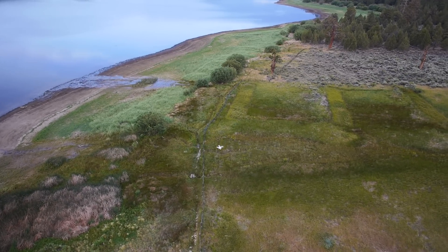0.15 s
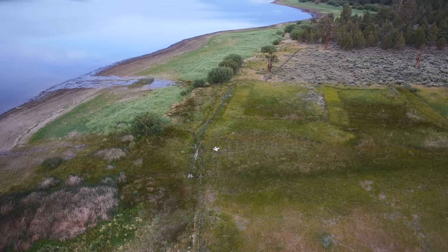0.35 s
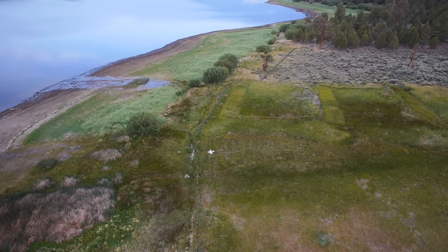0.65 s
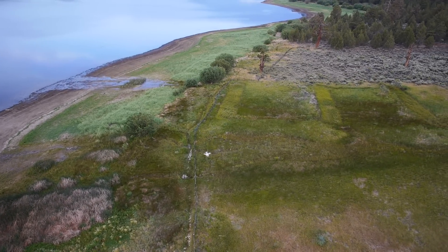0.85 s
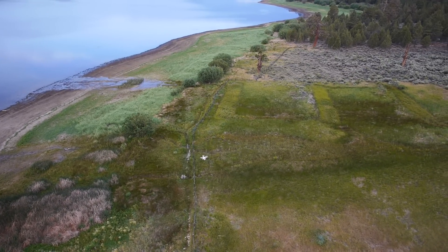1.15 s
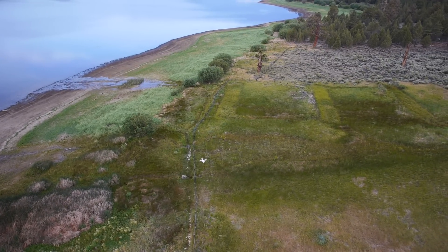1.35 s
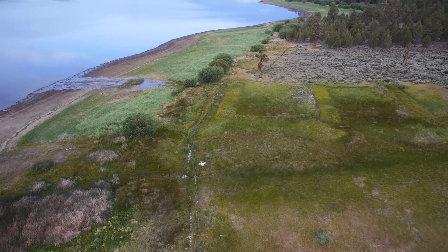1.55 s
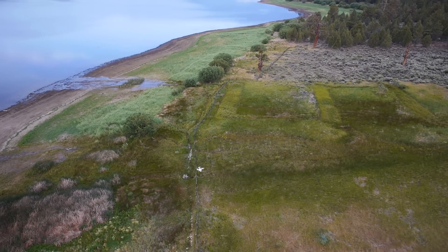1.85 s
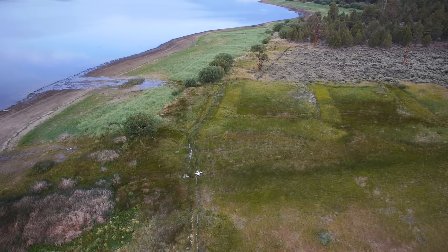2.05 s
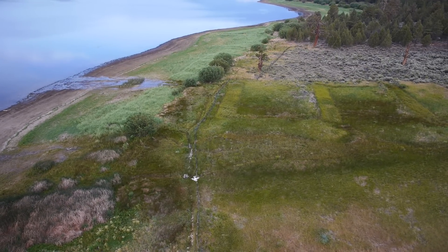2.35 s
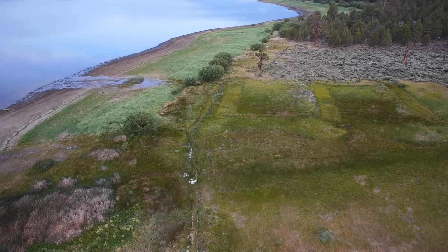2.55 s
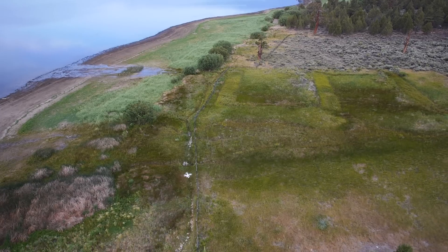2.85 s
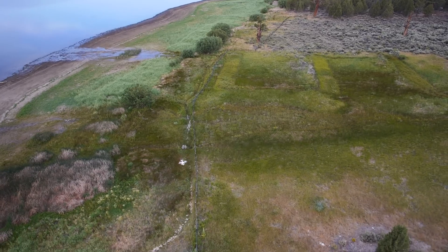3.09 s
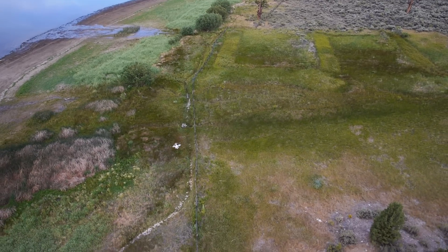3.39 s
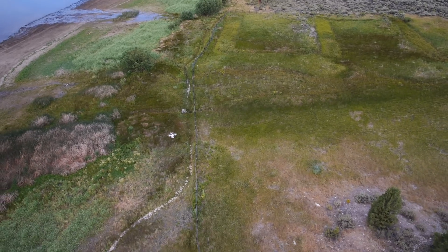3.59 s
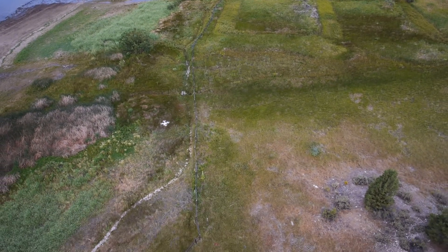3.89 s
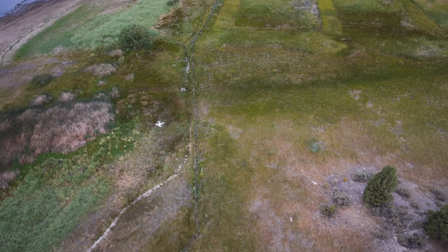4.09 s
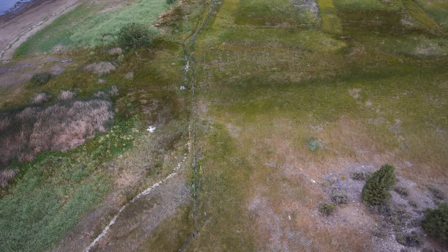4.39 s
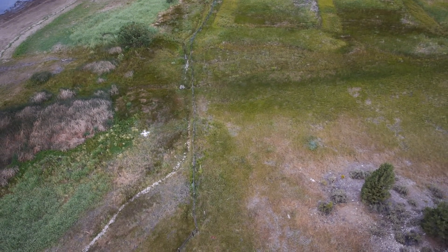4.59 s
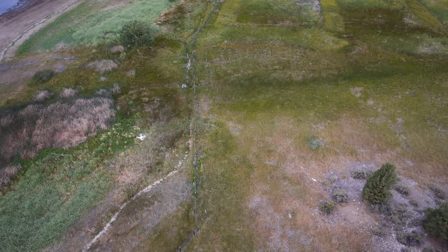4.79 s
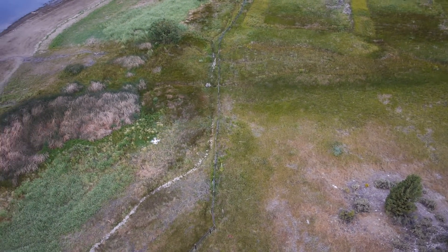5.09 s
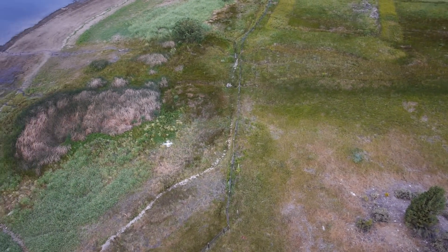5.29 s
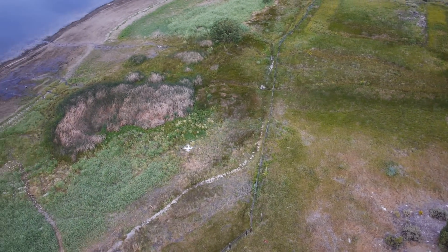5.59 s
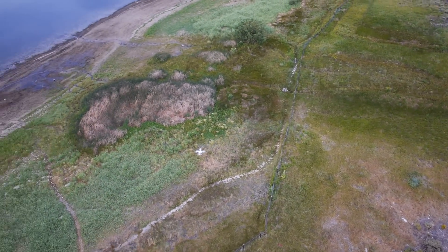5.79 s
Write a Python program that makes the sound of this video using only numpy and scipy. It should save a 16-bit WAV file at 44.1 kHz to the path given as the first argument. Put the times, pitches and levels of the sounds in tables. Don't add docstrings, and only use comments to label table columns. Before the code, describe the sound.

A multirotor drone buzzes steadily overhead in flight, a rough many-pitched propeller hum with airy hiss, heard very close from its own camera.

```python
import sys
import numpy as np
from scipy import signal
from scipy.fft import rfft, irfft, next_fast_len
from scipy.io import wavfile
from scipy.ndimage import uniform_filter1d, map_coordinates

SR = 44100
rng = np.random.default_rng(int(sys.argv[2]) if len(sys.argv) > 2 else 0)


def invert_db(level):
    return 10 ** (np.asarray(level, dtype=float) / 20)


def transcribe(signal):
    frames = np.atleast_2d(signal).T
    limited = np.clip(frames, -1, 1)
    pcm = np.round(limited * 32767).astype(np.int16)
    wavfile.write(sys.argv[1], SR, pcm)


N = 261947

# hum/dB, hum brightness/(dB per order), slap/dB, swish/dB, tip hiss/dB
ROTORS = [(-7.5, -.4, -11.5, -9.5, -6), (-1.5, 0.7, -3.5, 4, -4.5), (0.5, 0.72, -5.5, 3, 2),
          (-8, 0.3, -10, -8, -9), (-1, 0, -10, -18.5, -23), (1, -0.5, -6, -10.5, -18),
          (-15, 0.5, -18, -14, -5.5)]
# hum/dB, slap/dB
FACING = [(-.7, 1), (-.5, 0), (-1, 1), (-1, 0), (-2, -4.5), (-2, -3.5), (3.5, 3)]
# hover blade rate/Hz, share of thrust, of roll, of pitch, of yaw
MIXER = [(200.91, 0.16, 0.24, -0.87, -0.47), (188.742, 1.0, -1.0, 0.0, 0.0), (187.796, 1.0, 1.0, 0.0, 0.0),
         (192.21, 0.27, 0.45, -0.5, -1.02), (183.6, 1.14, -0.19, 1.0, -0.21),
         (185.7, 0.66, -0.11, 0.98, -0.66), (195.98, 0.51, -0.86, 0.02, -0.95)]
# t/s, change/Hz
THRUST = [(0.0, -1.45), (0.44, -2.24), (1.1, -0.94), (1.32, -0.06), (1.54, -1.25), (1.87, 1.4), (2.2, -0.2),
          (2.53, 1.81), (2.86, 2.23), (3.08, 1.44), (3.19, 2.19), (3.74, 0.62), (4.18, 0.76), (4.29, 1.81),
          (4.62, -0.18), (4.84, 0.36), (5.39, -1.26), (5.94, -1.44)]
ROLL = [(0, -3.53), (.22, -3.27), (.55, -4.97), (.77, -4.07), (.99, -.45), (1.21, -2.47), (1.87, -2.64),
        (2.09, -.82), (2.31, .05), (4.07, .97), (4.33, .1), (4.57, 9), (4.67, 11.2), (4.78, 9.2),
        (5.17, 1.16), (5.28, .94), (5.5, 4.47), (5.72, -2.81), (5.94, -3.64)]
PITCH = [(0.0, -0.35), (1.21, -2.91), (1.54, -0.41), (1.87, -2.97), (2.09, -0.05), (2.53, -1.61),
         (3.08, 0.84), (3.3, 0.41), (3.52, 1.57), (4.18, 3.0), (4.62, -2.99), (4.73, -3.25), (5.17, 2.14),
         (5.94, 4.39)]
YAW = [(0.0, 1.0), (0.66, 1.37), (0.88, -0.48), (1.65, -0.86), (1.98, -0.14), (2.09, -1.99), (2.86, 0.09),
       (3.41, -0.06), (4.4, 1.75), (4.51, -0.06), (5.06, 1.01), (5.5, -1.74), (5.72, -0.41), (5.94, -1.04)]
ROTOR_GUSTS = {0: [(.35, 0), (.55, -1.6), (.8, 0), (1.2, .4), (1.45, -1.6), (1.65, -.5), (1.85, 1.5),
               (2.15, -1), (2.5, 1.1), (2.8, 0), (5.3, 0), (5.5, 1.4), (5.75, -2.8)], 3: [(1.0, 0),
               (1.25, 1), (1.45, -1), (1.65, 1), (1.9, 0), (2.6, 0), (2.85, -1.2), (3.2, -1.5), (3.5, 0),
               (4.45, 0), (4.65, 1.4), (4.9, 0)], 4: [(.3, .8), (.7, -.5), (.9, .5), (1.1, -1), (1.35, 1),
               (1.8, .5), (2.2, 0), (4.4, 0), (4.65, -1), (4.9, 0)], 5: [(4.4, 0), (4.65, -1), (4.9, 0)]}
NEAR_START = {1: .01, 2: .413}
INERTIA_S = .1
HUNT_TURNS, HUNT_PER_S = .018, 7

# order of blade rate, level/dB
HUM_ORDERS = [(.5, -35.5), (1, -2), (1.5, -21), (2, -3), (2.5, -26.5), (3, -2.5), (3.5, -22.5), (4, -0.5),
              (4.5, -21), (5, -6), (6, -11), (7, -10.5), (8, -7), (9, -9), (10, -27)]
BLADE_TONE_DB = [6, 0, 1.5, -1, -5, -5, 3]
TONE_PER_FASTER_DB = 110
HUM_LAG_TURNS = .3
HUM_LOST_PER_ROLL_DB = .16
SHAKE_HZ, SHAKE_DB = 30, -24
OVERLOAD = .09
HUM_DB, HUM_PER_LOAD, HUM_PER_TILT_DB = -32, 0.43, -0.5

# t/s, slap and swish level/dB
LOAD = [(0, -25), (1, -25), (1.9, -25), (2.3, -25.5), (2.6, -24.5), (3, -25.5), (3.3, -27.5), (3.5, -26),
        (3.78, -28.5), (3.87, -25.5), (3.94, -29), (4.1, -29.5), (4.4, -28.5), (4.7, -26), (5.1, -27.5),
        (5.3, -26), (5.6, -27), (5.94, -26)]
# t/s, extra slap over swish/dB
SMOOTH_AIR = [(0, 0), (2.2, 1), (2.7, 6), (3.1, 8), (4.3, 8.5), (4.6, 5), (5.94, 3.5)]
# t/s, hiss level/dB
TIP_GUSTS = [(1.75, -7), (1.95, -5), (2.6, 2), (2.8, 2), (3.3, 6.5), (3.6, 5.5), (4.48, 7.5), (4.58, 6.5),
             (4.95, 5), (5.4, 6), (5.6, 6.5), (5.94, 0)]
# f/Hz, level/dB
SLAP = [(700, -21), (1100, -3), (1500, -3), (2100, 5.5), (2700, -2.5), (4200, -4), (5500, -8.5),
        (7000, -20.5), (9000, -43)]
# f/Hz, density/(dB per Hz)
SWISH = [(150, -25), (280, -27.5), (450, -15), (800, -18.5), (1300, -6), (2200, -4.5), (4200, -7.5),
         (5500, -10.5), (8000, -20), (11000, -28)]
TIPS = [(3500, -2.5), (6000, -10), (8000, -12), (9500, -9.5), (10100, -5.5), (11800, -5), (14100, -12),
        (15600, -18), (16500, -20)]
RUMBLE = [(12, -59), (20, -6), (59, -13), (134, -4), (145, -21), (160, -28), (210, -34), (350, -120)]
CLEAN_DB = -.8
ECHO_T60_S, SWISH_SHARP, WASH_DB = .005, 11, -10.5
TIPS_DB, TIPS_PER_LOAD, TIPS_PER_SMOOTH, TIPS_PER_ROLL_DB = -37, 0.058, 0.11, -0.51
LULL_S, LULL_WIDTH_S, LULL_DB = 3.87, .03, -7

SWITCH_HZ = 8039.3
# blade orders above SWITCH_HZ, level/dB
WHISTLE = [(-1, -65), (2, -63), (3, -68), (4, -58), (5, -60), (6, -57), (7, -60), (9, -58), (10, -58),
           (11, -61), (12, -64), (13, -66)]

# t/s, angle step (0 level, 1 half, 2 down)
TILT = [(0, 0.14), (2.1, 0.31), (2.6, 0.81), (3.1, 0.85), (3.6, 1.64), (4.4, 1.7), (4.8, 1.63), (5.94, 1.6)]
# f/Hz, width/Hz, level flat/dB, half tilted/dB, tilted down/dB
MOUNT = [(1890, 570, -5, -7, -3.5), (2394, 21, -0.5, 6, -1), (2890, 270, 3.5, -0.5, 3),
         (3450, 150, -4.5, -1.5, 0.5), (4030, 280, -3, 2, 3.5), (4120, 120, 6, 1.5, -5.5),
         (4410, 135, -1, -2, -4), (7500, 350, 1.5, 2.5, -4), (9100, 1300, 4, -6, 1.5),
         (10900, 710, 0.5, -3.5, -2), (14000, 3200, 8.5, -8, -4)]
# f/Hz, width/Hz
NOTCHES = [(3976, 18), (4640, 28), (5541, 40)]


def unit(x):
    return x / np.sqrt(np.mean(x ** 2) + 1e-20)


def curves(rows):
    s, *cols = np.transpose(rows)
    return np.array([np.interp(np.arange(N) / SR, s, c) for c in cols])


def wobble(rate_per_s):
    at = np.arange(0, N + 64, 64)
    knots = rng.standard_normal(int(N * rate_per_s / SR) + 4)
    return np.interp(np.arange(N), at, map_coordinates(knots, [at * rate_per_s / SR], order=2))


def filtered(x, response):
    m = next_fast_len(N + 8192)
    return irfft(rfft(x, m) * response(np.fft.rfftfreq(m, 1 / SR)), m)[:N]


def coloured(x, spectrum):
    hz, db = np.transpose(spectrum)
    return unit(filtered(x, lambda f: invert_db(np.interp(np.log(f + 1), np.log(hz), db, -120, -120))))


def rotor_speeds():
    commands = np.array([curves(c)[0] for c in (THRUST, ROLL, PITCH, YAW)])
    mixer = np.array(MIXER)
    asked = mixer[:, :1] + mixer[:, 1:] @ commands
    for rotor, change in ROTOR_GUSTS.items():
        asked[rotor] += curves(change)[0]
    return uniform_filter1d(asked, round(INERTIA_S * SR), axis=1, mode="nearest")


def blade_turns(speeds):
    turns = np.cumsum(speeds, axis=1) / SR + rng.random((len(ROTORS), 1))
    for near, start in NEAR_START.items():
        turns[near] += start - turns[near, 0] % 1
    return turns + HUNT_TURNS * np.array([wobble(HUNT_PER_S) for _ in turns])


def hum(turns, faster):
    out = np.zeros(N)
    tilt = curves(TILT)[0]
    stall_db = HUM_LOST_PER_ROLL_DB * abs(curves(ROLL)[0]) * tilt
    tones_db = np.array(BLADE_TONE_DB)[:, None] + TONE_PER_FASTER_DB * faster
    for turn, (level_db, bright_db, *_), (facing_db, _), tone_db in zip(turns, ROTORS, FACING, tones_db):
        rotor_db = level_db + facing_db * tilt
        for order, db in HUM_ORDERS:
            order_db = db + rotor_db + bright_db * (order - 2.5) + 2.4 * wobble(6.5)
            gain = invert_db(order_db + tone_db * (order == 1) - stall_db * (order > 1))
            phase = order * turn - HUM_LAG_TURNS * rng.random() + 0.03 * order * wobble(12)
            out -= gain * np.cos(2 * np.pi * phase)
            if order == 1:
                shaken = phase + SHAKE_HZ * np.arange(N) / SR
                out += gain * invert_db(SHAKE_DB) * np.sin(2 * np.pi * shaken)
    beats = filtered(unit(out) ** 2, lambda f: np.interp(f, [160, 205], [0, 1]))
    return unit(out) + OVERLOAD * beats


def slaps(turns, scatter_db, jitter_s, echo_db):
    out, t = np.zeros(N), np.arange(200) / SR
    for turn, (_, _, slap_db, *_), (_, facing_db) in zip(turns, ROTORS, FACING):
        passes = np.arange(np.ceil(turn[0]), turn[-1])
        chance = rng.standard_normal((len(passes), 2))
        at = np.interp(passes, turn, np.arange(N)) + jitter_s * SR * chance[:, 0]
        tilt = np.interp(at / SR, *np.transpose(TILT))
        unequal_db = 0.14 * (passes % 2)
        size = invert_db(slap_db + facing_db * tilt + scatter_db * chance[:, 1] + unequal_db)
        train = np.bincount(np.clip(np.round(at), 0, N - 1).astype(int), size, N)
        out -= train
        mix = 1.1 * wobble(2.5)
        for share in (np.cos(mix), np.sin(mix)):
            path = unit(rng.standard_normal(len(t)) * invert_db(-60 * t / ECHO_T60_S)) / np.sqrt(len(t))
            out += invert_db(echo_db) * signal.oaconvolve(train * share, path)[:N]
    return coloured(out, SLAP)


def puffs(turns, gusts, reach_db, sharp, between_db, scatter_db):
    power = np.zeros(N)
    for turn, gain in zip(turns, invert_db(2 * (reach_db + scatter_db * gusts))):
        power += gain * np.exp(sharp * (np.cos(2 * np.pi * turn) - 1))
    return np.sqrt(power + invert_db(2 * between_db)) * rng.standard_normal(N)


def patchy(x, depth_db):
    z = signal.stft(x, nperseg=512)[2]
    field = uniform_filter1d(uniform_filter1d(rng.standard_normal(z.shape), 7, 0), 14, 1)
    return signal.istft(z * invert_db(depth_db * unit(field)), nperseg=512)[1][:N]


def blade_swish(turns, gusts, faster):
    reach_db = np.array(ROTORS)[:, 3:4] + 45 * faster
    x = puffs(turns, gusts, reach_db, sharp=SWISH_SHARP, between_db=WASH_DB, scatter_db=1.5)
    return coloured(patchy(x, depth_db=0.6), SWISH)


def tip_hiss(turns, gusts, faster):
    reach_db = np.array(ROTORS)[:, 4:5] + 90 * faster
    between_db = -9 - 2.5 * curves(TILT)[0]
    x = puffs(turns, gusts, reach_db, sharp=14, between_db=between_db, scatter_db=2.3)
    return coloured(patchy(x, depth_db=-0.5), TIPS)


def mount(x):
    hz, width, *angles = np.transpose(MOUNT)[:, :, None]
    tilt = np.clip(curves(TILT)[0], 0, 2)
    out = np.zeros(N)
    for step, db in enumerate(angles):
        colour = lambda f: invert_db(np.sum(db * np.exp(-((f - hz) / width) ** 2), axis=0))
        out += np.clip(1 - abs(tilt - step), 0, 1) * filtered(x, colour)
    return out


def drives(turns):
    carrier = SWITCH_HZ * np.arange(N) / SR
    out = invert_db(-61 + 1.5 * wobble(4)) * np.sin(2 * np.pi * carrier)
    for order, db in WHISTLE:
        phase = carrier + order * turns[2] + rng.random()
        out += invert_db(db + 5.5 + 2 * wobble(4)) * np.sin(2 * np.pi * phase)
    return out


def rumble():
    return invert_db(-70) * coloured(invert_db(5 * wobble(9)) * rng.standard_normal(N), RUMBLE)


def scene():
    speeds = rotor_speeds()
    turns = blade_turns(speeds)
    faster = speeds / speeds.mean(axis=1, keepdims=True) - 1
    gusts = np.array([rng.standard_normal(int(turn[-1]) + 3)[np.round(turn).astype(int)] for turn in turns])

    body_db, smooth_db = curves(LOAD)[0], curves(SMOOTH_AIR)[0]
    load_db = body_db - body_db.mean()
    clean_db = CLEAN_DB + smooth_db
    hum_db = HUM_DB + HUM_PER_LOAD * load_db + HUM_PER_TILT_DB * curves(TILT)[0]
    tips_db = TIPS_DB + curves(TIP_GUSTS)[0] + TIPS_PER_LOAD * load_db
    tips_db += TIPS_PER_SMOOTH * smooth_db + TIPS_PER_ROLL_DB * curves(ROLL)[0]
    lull = invert_db(LULL_DB * np.exp(-((np.arange(N) / SR - LULL_S) / LULL_WIDTH_S) ** 2))

    knocks = slaps(turns, scatter_db=.8, jitter_s=.000008, echo_db=-4.5)
    swish = blade_swish(turns, gusts, faster)
    body = invert_db(clean_db / 2) * knocks + invert_db(-clean_db / 2) * swish
    blades = lull * invert_db(body_db - 2.0) * body + invert_db(tips_db) * tip_hiss(turns, gusts, faster)
    return (invert_db(hum_db) * hum(turns, faster) + mount(blades) + drives(turns) + rumble())[None]


def low_pass(x):
    return signal.sosfilt(signal.butter(12, 15750, fs=SR, output="sos"), x)


def record(dry):
    x = dry[0]
    leaning = x - .45 * filtered(x ** 2, lambda f: np.interp(f, [400, 900], [0, 1]))
    rounded = leaning / (1 + abs(leaning / .6) ** 4) ** .25

    def response(f):
        gain = np.interp(f, [140, 172], [.6, 1])
        for c, w in NOTCHES:
            gain = gain * (c * c - f * f + .1j * f * w) / (c * c - f * f + 1j * f * w)
        return gain

    return low_pass(filtered(rounded, response)[None])


dry = scene()
out = record(dry)
transcribe(out)
```